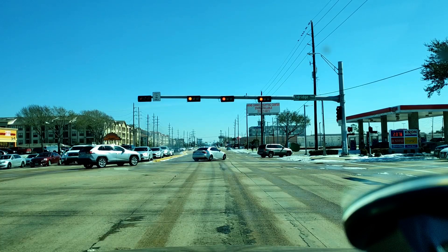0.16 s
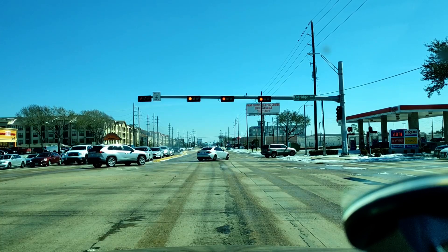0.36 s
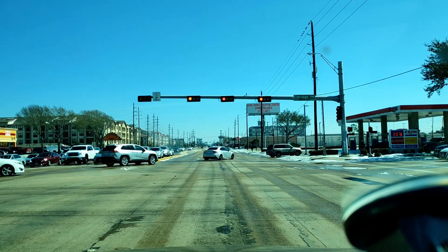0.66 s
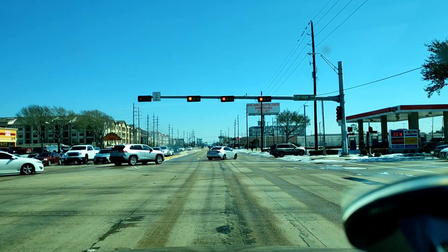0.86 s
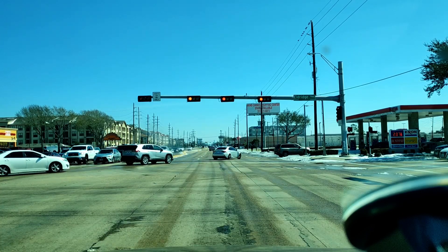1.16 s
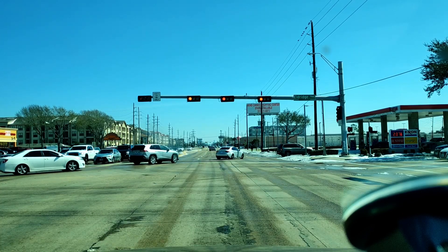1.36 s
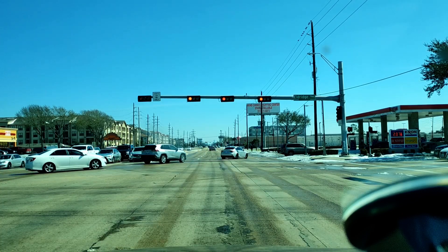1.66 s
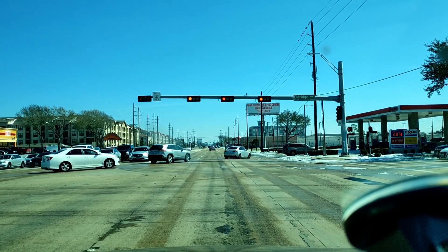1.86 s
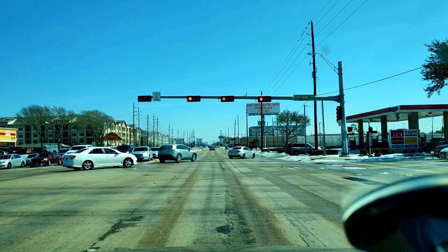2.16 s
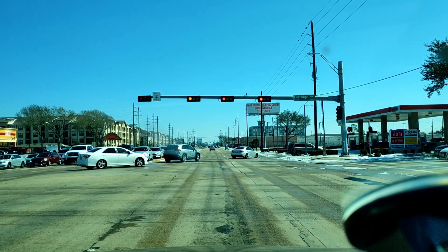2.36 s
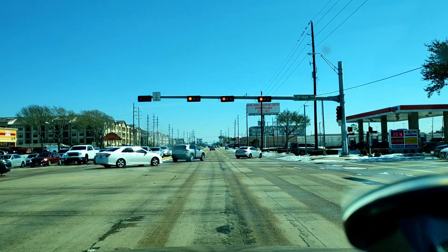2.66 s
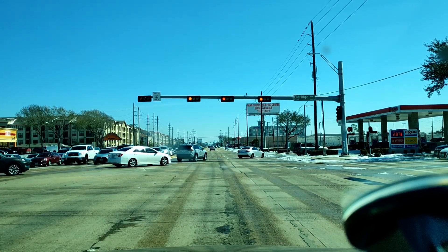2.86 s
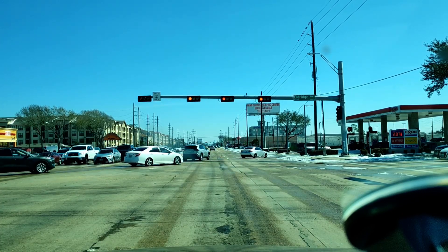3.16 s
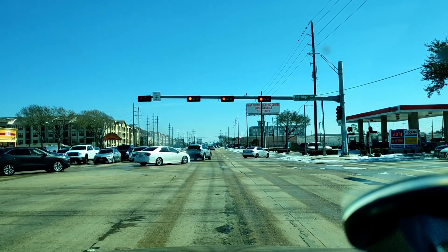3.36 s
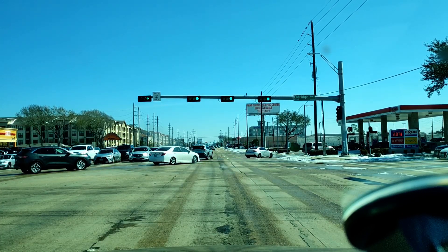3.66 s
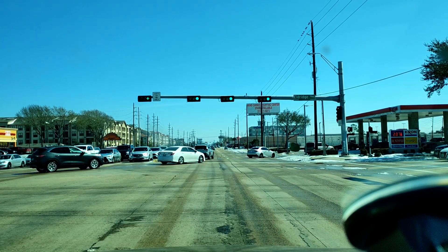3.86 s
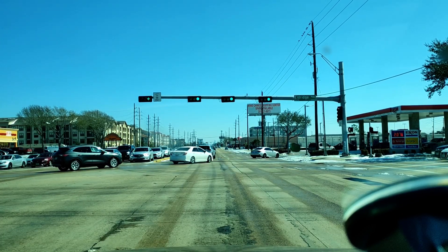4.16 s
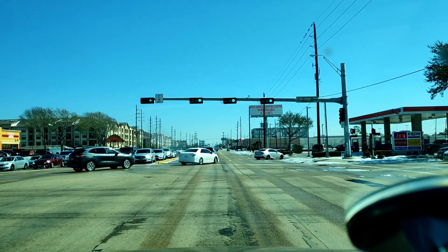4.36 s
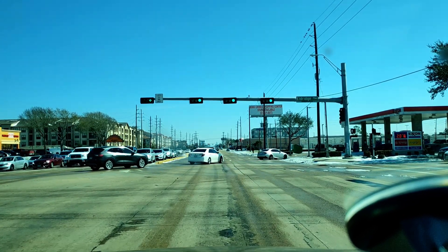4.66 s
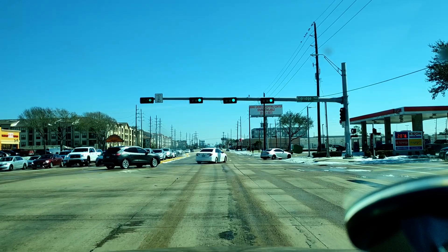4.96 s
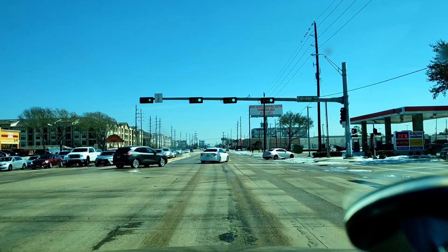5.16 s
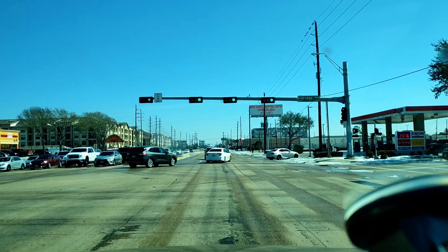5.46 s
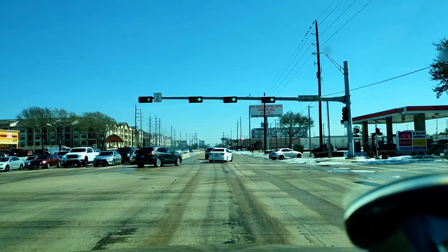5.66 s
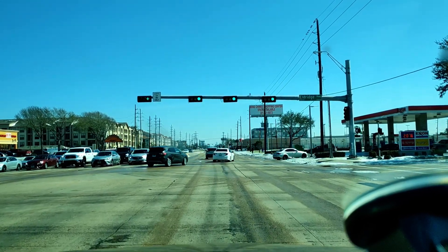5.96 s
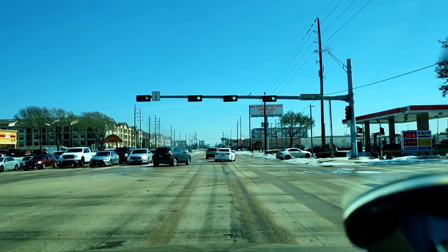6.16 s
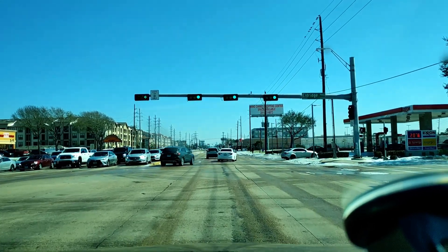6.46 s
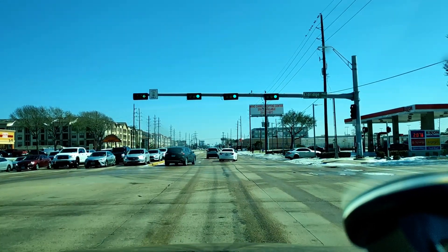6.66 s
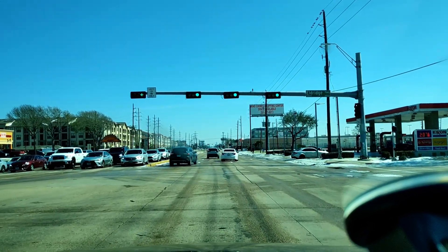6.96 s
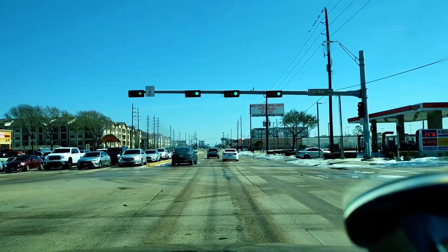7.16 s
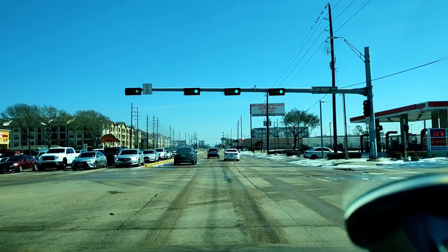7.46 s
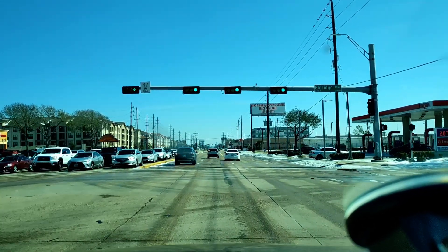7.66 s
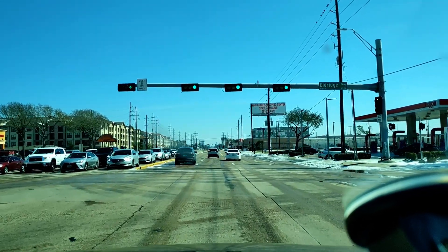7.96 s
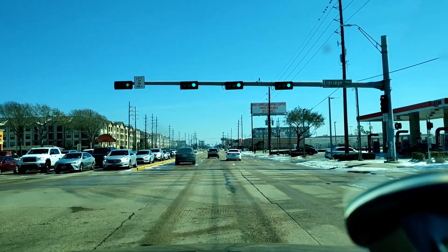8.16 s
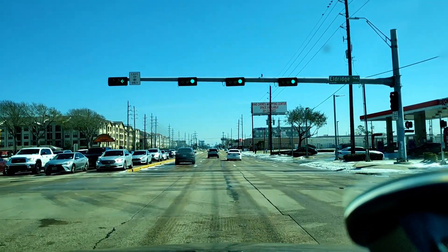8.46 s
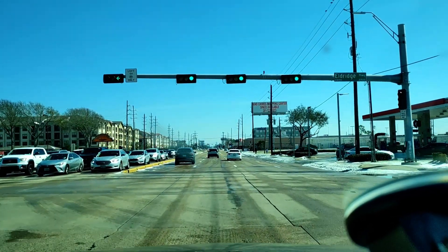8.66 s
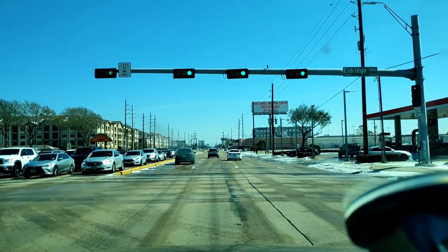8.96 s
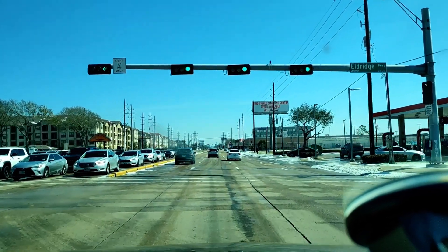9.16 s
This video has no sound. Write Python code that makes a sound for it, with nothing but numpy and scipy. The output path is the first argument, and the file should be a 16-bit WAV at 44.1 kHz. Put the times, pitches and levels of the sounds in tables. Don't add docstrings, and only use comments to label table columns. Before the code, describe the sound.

Heard from the dashboard inside a car waiting at a junction, a steady deep engine idle hums with soft fan wash and faint hiss. After about four seconds the brake eases with scuffs and ticks, then the engine pitch climbs as the car pulls away. Tyre rumble and low cabin booms grow, the gear shifts up once, and sharp plastic clicks punctuate the drive.

```python
import sys
import numpy as np
from scipy import signal
from scipy.fft import rfft, irfft, next_fast_len
from scipy.io import wavfile
from scipy.ndimage import map_coordinates

SR = 44100
rng = np.random.default_rng(int(sys.argv[2]) if len(sys.argv) > 2 else 0)


def generate_wav(signal):
    frames = np.transpose(np.atleast_2d(signal))
    scaled = np.clip(frames, -1, 1) * 32767
    pcm = np.round(scaled).astype(np.int16)
    wavfile.write(sys.argv[1], SR, pcm)


def makeup_ratio(level_db):
    decades = np.asarray(level_db, float) / 20
    return 10 ** decades


N = 410571
TIME = np.arange(N) / SR
STEP = 16
COARSE = TIME[::STEP]
PULL_AWAY_S = 4.97

# frequency in Hz, likeness from -1 to 1.
ALIKE = [(30, 0.76), (60, 0.68), (130, 0.77), (280, 0.89), (620, 0.59), (1340, -0.22), (2920, 0.056),
         (6360, -0.01), (13800, 0.01)]
# frequency in Hz, left minus right in dB.
PORTS = [(4500, 0), (6000, -3.5), (7700, -10), (8800, 0), (10000, 6.5), (11500, 14), (14000, 13)]


def unit(x):
    return x / np.sqrt(np.mean(x ** 2) + 1e-20)


def along(points, hz):
    f, v = np.transpose(points)
    return np.interp(np.log(hz + 1), np.log(f + 1), v)


def curves(rows, t=TIME):
    s, *cols = np.transpose(rows)
    return [np.interp(t, s, c) for c in cols]


def wobble(rate, t=COARSE):
    knots = rng.standard_normal(200)
    return np.interp(t, COARSE, map_coordinates(knots, [COARSE * rate]))


def filtered(x, response):
    m = next_fast_len(N + SR // 2)
    return irfft(rfft(x, m) * response(np.fft.rfftfreq(m, 1 / SR)), m)[..., :N]


def rush(spectrum, alike):
    def shape(hz):
        turn = np.arccos(np.clip(along(alike, hz), -1, 1)) / 2
        return makeup_ratio(along(spectrum, hz)) * [np.cos(turn), np.sin(turn)]

    mid, side = filtered(rng.standard_normal((2, N)), shape)
    return unit(np.array([mid + side, mid - side]))


def sided(x, balance):
    return filtered(x, lambda hz: makeup_ratio(along(balance, hz) * [[.5], [-.5]]))


def turning(hz):
    return 2 * np.pi * np.cumsum(hz) * STEP / SR


def decades():
    creep_s = 0.11
    return np.log10(np.clip(TIME - PULL_AWAY_S, 0, None) + creep_s)


def port_hiss():
    # frequency in Hz, dB per Hz.
    hiss_color = [(500, -16), (1200, 3), (2000, 1), (4000, -2), (5500, -2), (7800, 1.5), (9500, 0),
                  (11000, -2.5), (14200, -3.5)]
    # frequency in Hz, left minus right in dB.
    hiss_sides = [(6000, 0), (7700, -5.5), (8500, 1), (9600, 6), (14000, 6)]
    return makeup_ratio(-70) * sided(rush(hiss_color, [(1000, 0)]), hiss_sides)


def engine_bay():
    # frequency in Hz, dB per Hz.
    wash_color = [(12, -17), (50, -1.5), (100, -4.5), (170, -15), (340, -18), (450, -24), (640, -27.5),
                  (770, -24), (815, -34.5), (1050, -39), (1230, -32), (1340, -41), (2000, -49.5),
                  (4000, -75)]
    return makeup_ratio(-46 + 0.96 * wobble(5, TIME)) * rush(wash_color, ALIKE)


def road():
    # frequency in Hz, dB per Hz.
    rumble_color = [(29, -37), (50, -1), (70, -5), (100, -13), (150, -19.5), (220, -21), (270, -26),
                    (335, -24.5), (400, -32.5), (520, -34), (700, -78)]
    # frequency in Hz, dB per Hz.
    roar_color = [(300, -35), (400, 3), (470, -5), (780, -6), (1000, -15.5), (1600, -18.5), (2600, -23.5),
                  (3350, -24), (4200, -28), (7000, -27.5), (9500, -32), (14000, -49)]
    # frequency in Hz, left-right likeness from -1 to 1.
    road_alike = [(35, 0.63), (60, 0.75), (130, 0.66), (280, 0.76), (620, 0.24), (1340, -0.46),
                  (2920, 0.13), (6360, -0.14), (13800, 0.24)]
    patch_db = 2.5 * np.exp(-((TIME - 8.25) / 0.44) ** 2)
    surface = wobble(3.3, TIME)
    rumble_db = -43 + 19.5 * decades() + 0.7 * surface + 1.1 * wobble(9.5, TIME)
    roar_db = -60 + 10.5 * decades() + patch_db + 0.4 * surface
    rumble = makeup_ratio(rumble_db) * rush(rumble_color, road_alike)
    return rumble + makeup_ratio(roar_db) * sided(rush(roar_color, road_alike), PORTS)


def hums():
    # start in seconds, end in seconds, from Hz, to Hz, level in dB.
    glides = [(2.552, 2.94, 207, 199.4, -49.5), (4.098, 4.408, 196.8, 215, -50),
              (5.056, 5.403, 190.5, 196.3, -49), (5.256, 5.495, 268, 272, -53),
              (5.701, 6.1, 264.6, 288, -48), (7.812, 8.145, 464, 482, -52), (5.895, 6.408, 65.2, 94.4, -43),
              (6.688, 7.193, 215.2, 192.8, -41.5), (7.2, 7.7, 252, 257.2, -52),
              (7.503, 8.4, 74, 100.4, -44), (7.547, 8.2, 204.6, 254, -44), (7.75, 8.402, 196, 196.8, -46),
              (8.102, 8.5, 759, 787, -55), (8.606, 9.048, 239.4, 210.5, -39.5), (9.06, 9.4, 218, 228, -40)]
    out = 0
    for start, end, from_hz, to_hz, db in glides:
        u = np.clip((COARSE - start) / (end - start), 0, 1)
        phase = turning(from_hz + (to_hz - from_hz) * u) + .5 * wobble(10)
        out = out + makeup_ratio(db - 1.5 + 0.94 * wobble(10)) * np.sin(np.pi * u) * np.sin(phase)
    return out


def mount():
    # time in seconds, peak in dB.
    snaps = [
        (7.0797, -41),
        (7.2604, -58),
        (8.3344, -55),
        (8.634, -41),
        (8.8308, -39),
        (9.1247, -34),
        (9.158, -58),
    ]
    kicks, t = np.zeros(N), TIME[:200]
    for s, db in snaps:
        decay = makeup_ratio(db + 9 - 60 * t / 0.009)
        kicks[round(s * SR):][:len(t)] = decay * rng.standard_normal(len(t))

    def housing(hz):
        u = hz / 7600
        return ((1j * u) ** 2 / (1 - u ** 2 + 1j * hz / 6100)) ** 2

    return filtered(kicks, housing) * makeup_ratio([[0], [-25]])


def trim(hz):
    # centre in Hz, width in Hz, level in dB.
    hollows = [(300, 130, 4), (560, 90, 6.5), (800, 120, -0.5), (1526, 46, 0.5), (2083, 52, 5.5),
               (2440, 250, -8)]
    out = 0
    for k, (c, w, db) in enumerate(hollows):
        out = out + (-1) ** k * makeup_ratio(db) * 1j * hz * w / (c * c - hz * hz + 1j * hz * w)
    return out


def scuffs():
    # start in seconds, length in seconds, dB above 6 kHz, dB below it, trim dB.
    strokes = [(4.231, 0.052, -51.5, -53.5, -66), (4.26, 0.052, -54, -55, -59),
               (4.277, 0.055, -56.5, -49, -67), (4.557, 0.021, -59, -73, -67),
               (4.679, 0.045, -70, -79, -70), (5.21, .03, -76, -68, -75), (5.477, 0.023, -74, -68, -72),
               (5.612, 0.032, -63.5, -75, -78), (5.843, 0.027, -74, -70, -66),
               (6.128, 0.043, -70, -61, -64), (6.237, 0.055, -68, -52.5, -59), (6.382, 0.04, -59, -58, -65),
               (8.88, .02, -69, -75, -86), (9.282, 0.03, -45, -46, -62)]
    levels, t = np.zeros((3, N + SR)), TIME[:SR // 4]
    for s, length, *levels_db in strokes:
        grain = makeup_ratio(3.5 * map_coordinates(rng.standard_normal(200), [t * 400]))
        swell = np.abs(np.sin(np.pi * np.clip(t / length, 0, 1) ** 0.71)) ** 1.3
        levels[:, round(s * SR):][:, :len(t)] += makeup_ratio(levels_db)[:, None] * grain * swell
    return levels[:, :N]


def ticks():
    # time in seconds, peak dB above 6 kHz, dB below it, trim knock dB, tail t60 in seconds.
    contacts = [
        (3.761, -80, -63, -64, .05),
        (4.370, -49, -46.5, -53.5, 0.11),
        (4.494, -48, -59, -63, 0.071),
        (4.535, -53, -61, -64, 0.093),
        (5.987, -49, -47, -40, 0.067),
        (6.242, -39.5, -47, -49, 0.068),
        (6.372, -64, -49, -53, 0.12),
        (7.168, -78, -72, -60, 0.04),
        (9.275, -46, -50, -58, .03),
        (9.283, -32.5, -41, -46, 0.066),
    ]
    levels, blows, t = np.zeros((3, N + SR)), np.zeros(N), TIME[:SR // 4]
    for s, top_db, middle_db, knock_db, t60 in contacts:
        at = round(s * SR)
        snap = makeup_ratio(-60 * t / 0.013) + makeup_ratio(-4.5 - 60 * t / t60)
        levels[:2, at:][:, :len(t)] += makeup_ratio([[top_db], [middle_db]]) * snap
        levels[2, at:][:len(t)] += makeup_ratio(knock_db + 3.0 - 60 * t / t60)
        blows[at] = makeup_ratio(knock_db + 23.0)
    return levels[:, :N], blows


def thuds():
    # time in seconds, level in dB.
    thumps = [
        (4.236, -44),
        (4.5, -46),
        (4.537, -47),
        (5.985, -47),
        (7.168, -41.5),
        (8.82, -53),
        (9.269, -38),
    ]
    # frequency in Hz, dB per Hz.
    thud_color = [(100, -30), (200, 11), (350, 3.5), (600, 1), (1000, -8.5), (1800, -12), (2300, -45)]
    level, t = np.zeros(N + SR), TIME[:SR // 4]
    for s, db in thumps:
        level[round(s * SR):][:len(t)] += makeup_ratio(db - 60 * t / .12) * (1 - np.exp(-t / 0.0013))
    return level[:N] * rush(thud_color, ALIKE)


def handling():
    # time in seconds, level in dB.
    rub = [
        (4.1, -92),
        (4.2, -72),
        (4.9, -75),
        (4.97, -63.5),
        (5.28, -64.5),
        (5.48, -58.5),
        (5.62, -65),
        (6.6, -71.5),
        (7.5, -79),
    ]
    # frequency in Hz, dB per Hz.
    cloth_color = [(600, -40), (1500, -4.5), (3000, -2.5), (5500, -4.5), (7700, 1.5), (9000, 0),
                   (11500, -5.5), (14200, -9)]
    # frequency in Hz, gain in dB.
    wheel_rim = [(1200, 0), (2000, 1), (2700, 2.5), (3600, -1.5), (4500, 2), (5500, 2)]
    near = [(1000, 0.32), (4000, 0.045)]
    rub_db, = curves(rub)
    tick_levels, blows = ticks()
    top, middle, dull = scuffs() + tick_levels

    cloth = sided(rush(cloth_color, near), PORTS)
    upper = filtered(cloth, lambda hz: 1 / (1 + (6000 / (hz + 1)) ** 10))
    rim = filtered(cloth - upper, lambda hz: makeup_ratio(along(wheel_rim, hz)))
    knock = unit(filtered(rush([(300, 0), (9000, 0)], near), trim))
    ring = filtered(blows, lambda hz: trim(hz) / (1 + 1j * hz / 2500) ** 2)
    ring = np.array([ring, np.roll(ring, 12)])
    slide = makeup_ratio(rub_db + 0.65 * wobble(20.5, TIME))
    return slide * cloth + top * upper + middle * rim + dull * knock + ring + thuds()


def boom():
    # Pitching, floor pan and cabin air modes, in Hz.
    body_hz = (23.7, 35.97, 43.86)
    resting_db = (-40.5, -40.5, -74)
    # peak in seconds, body ring in Hz, peak in dB, swell in seconds.
    bumps = [(5.78, 34.6, -33, 0.15), (6.08, 30, -20.5, 0.057), (6.32, 37.3, -29.5, 0.12),
             (6.439, 25.0, -21.0, 0.12), (6.719, 21.9, -19.6, 0.2), (6.74, 39.9, -23.5, 0.26),
             (6.838, 25.9, -37, 0.17), (7.179, 36.6, -32.5, 0.26), (7.22, 26.9, -17, 0.14),
             (7.241, 40.8, -22.4, 0.066), (7.378, 42.3, -23.5, 0.079), (7.639, 24.2, -14.5, 0.08),
             (7.698, 39.4, -19, 0.032), (7.879, 27.7, -23, 0.08), (7.979, 38.7, -26.4, 0.14),
             (8.081, 29.45, -22.5, 0.16), (8.381, 33.0, -20.5, 0.043), (8.46, 42.7, -23.5, 0.31),
             (8.558, 37.5, -24, 0.25), (8.64, 27.3, -26.5, 0.061), (8.819, 31.5, -14.5, 0.05),
             (8.861, 20.7, -21.5, 0.12), (8.938, 32.3, -21, 0.037), (9.06, 38, -29, 0.12),
             (9.12, 26.6, -25.5, 0.046), (9.282, 35.0, -8.5, 0.057)]
    rolling = np.clip((COARSE - PULL_AWAY_S) / 0.26, 0, 1)
    shake_db = -36.5 + 6 * decades()[::STEP]
    out = 0
    for hz, db in zip(body_hz, resting_db):
        level = makeup_ratio(db) + rolling * makeup_ratio(shake_db + 1.5 * wobble(6.5))
        out = out + level * np.sin(turning(hz * (1 + 0.06004 * wobble(6))))
    for s, hz, db, swell in bumps:
        u = np.clip((COARSE - s) / swell + 1, 0, None)
        envelope = (u * np.exp(1 - u)) ** 2
        out = out - makeup_ratio(db) * envelope * np.cos(2 * np.pi * hz * (COARSE - s))
    return out


def engine():
    # time in seconds, engine speed in rpm.
    rpm_rows = [(0, 888), (4.9, 884), (5.15, 961), (5.57, 1171), (5.86, 1341), (6.1, 1405), (6.55, 1476),
                (7.05, 1614), (7.45, 1703), (7.64, 1706), (7.8, 1455), (7.97, 1520), (8.35, 1680),
                (8.6, 1719), (9.0, 1780), (9.31, 1855)]
    # time in seconds, level in dB.
    rocking = [
        (0, -33.5),
        (2, -35.5),
        (4.25, -35),
        (4.4, -43),
        (4.9, -37.5),
        (5.2, -40),
        (5.5, -68),
    ]
    # time in seconds, gain in dB.
    twist = [(0, 0), (4.2, 0), (4.5, -3), (5.0, -1.5), (5.15, -4), (5.37, 0), (6.2, -0.5), (6.6, 3),
             (7.05, -4.5), (7.3, -0.5), (7.6, -2.5), (7.72, -2), (7.9, -1), (8.4, 3.5), (9.31, 0.5)]
    # time in seconds, gain in dB.
    throttle = [
        (0, -0.5),
        (5, -2),
        (5.4, -2),
        (6, 0),
        (7.55, 0),
        (7.75, -6),
        (8.05, -3),
        (8.4, 3),
        (9.31, -6),
    ]
    main_orders = (3, 4.5, 6)
    main_levels = (-28, -45, -40.5)
    # frequency in Hz, gain in dB.
    cabin = [(44, 0), (70, -7.5), (79, -11), (90, -6.5), (110, 3), (130, -2.5), (142, -21.5), (172, -11)]
    # multiple of shaft speed, level in dB.
    upper_orders = [(1.5, -58), (7, -60), (7.5, -55), (9, -53), (9.5, -62), (12, -63), (13.5, -66),
                    (18, -59), (20, -66), (24, -72), (30, -67), (40, -73)]
    # frequency in Hz, gain in dB.
    panels = [(60, 1), (135, -0.7), (165, -12), (197, 2.5), (230, -7), (268, -0.1), (296, -5), (330, -7.5),
              (390, -9.5), (440, -1.6), (490, -5.5), (560, -21), (592, 0.5), (640, -19)]
    rpm, = curves(rpm_rows, COARSE)
    rocking_db, = curves(rocking, COARSE)
    torque_db, = curves(twist, COARSE)
    load_db, = curves(throttle, COARSE)
    shaft_hz = rpm / 60 * (1 + .001 * wobble(5))
    angle = turning(shaft_hz) + 2.36

    out = makeup_ratio(rocking_db + 1.2 * wobble(6)) * np.sin(2 * angle)
    for k, db, unsteady_db in zip(main_orders, main_levels, (.4, 2.2, 1.5)):
        level_db = db + torque_db + along(cabin, k * shaft_hz) + unsteady_db * wobble(6)
        out = out + makeup_ratio(level_db) * np.sin(k * angle)
    for k, db in upper_orders:
        gain = makeup_ratio(db + load_db + along(panels, k * shaft_hz) + 1.8 * wobble(7))
        out = out + gain * np.sin(k * angle + .5 * wobble(8) + rng.uniform(0, 7))
    return np.sqrt(2) * out


def tones():
    low = signal.resample_poly(hums() + boom() + engine(), STEP, 1, padtype="line")[:N]
    across = .14 * np.gradient(low) * STEP
    return np.array([low - across, low + across]) * makeup_ratio([[.15], [-.15]])


def scene():
    return engine_bay() + road() + mount() + handling() + tones()


def band_limit(x):
    return signal.sosfilt(signal.butter(12, 14440, fs=SR, output="sos"), x)


def record(dry):
    mix = filtered(dry + port_hiss(), lambda hz: makeup_ratio(-np.clip(hz - 14300, 0, 900) / 10))
    return band_limit(mix)


dry = scene()
out = record(dry)
generate_wav(out)
```